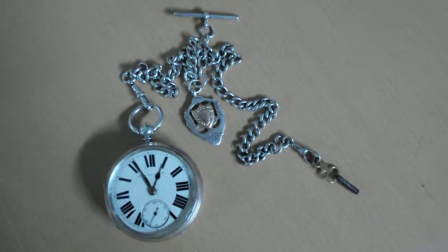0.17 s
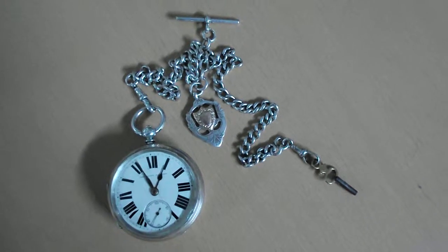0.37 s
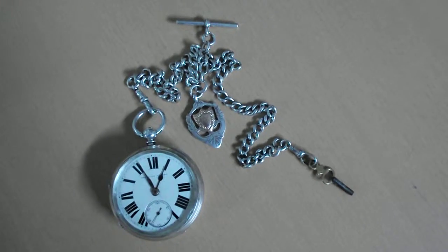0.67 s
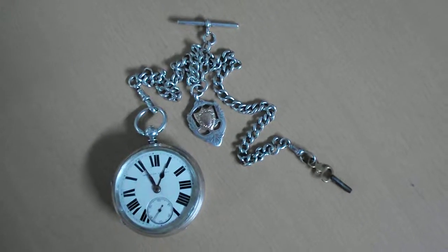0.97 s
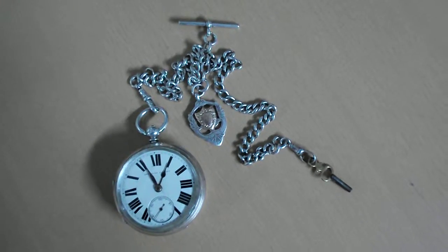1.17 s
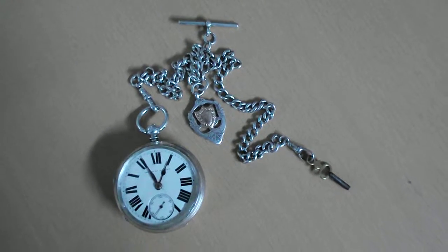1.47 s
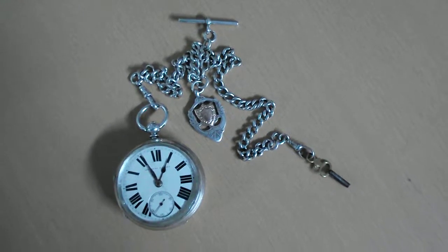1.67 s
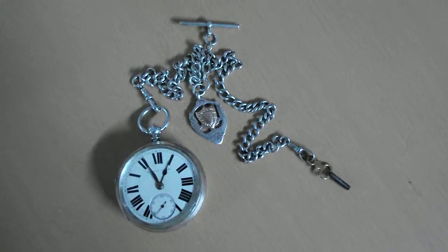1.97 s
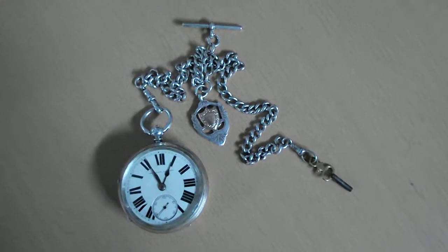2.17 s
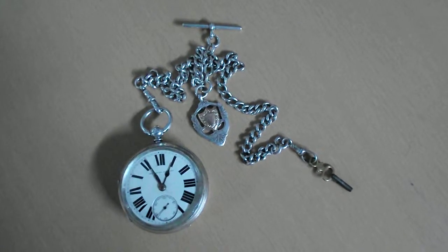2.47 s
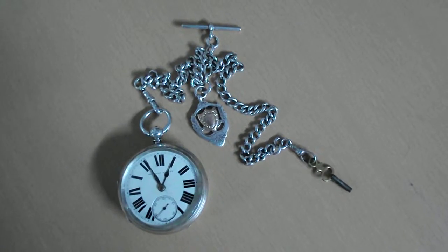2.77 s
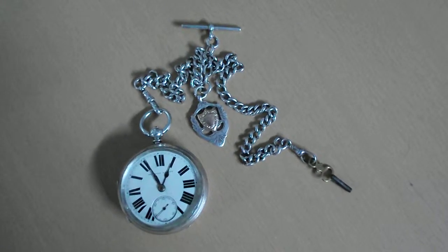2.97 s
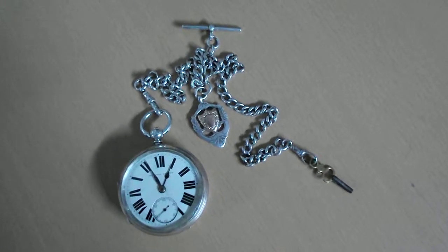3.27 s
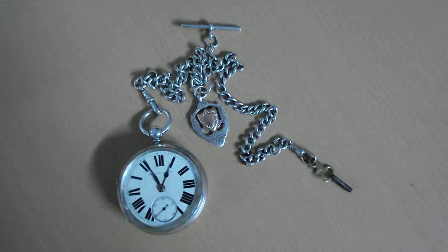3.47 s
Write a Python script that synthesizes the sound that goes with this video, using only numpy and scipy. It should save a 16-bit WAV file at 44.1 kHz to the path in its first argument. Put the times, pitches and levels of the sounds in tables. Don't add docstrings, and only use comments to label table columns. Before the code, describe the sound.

A pocket watch ticks crisply and steadily over low room rumble and constant hiss.

```python
import sys
import numpy as np
from scipy import signal
from scipy.fft import rfft, irfft, next_fast_len
from scipy.io import wavfile

SR = 44100
rng = np.random.default_rng(int(sys.argv[2]) if len(sys.argv) > 2 else 0)


def dump(signal):
    limited = np.clip(np.atleast_2d(signal).T, -1, 1)
    pcm = np.round(limited * 32767).astype(np.int16)
    wavfile.write(sys.argv[1], SR, pcm)


def how_loud(loudness_db):
    steps = np.asarray(loudness_db, float) / 20
    return 10 ** steps


N = 159642
TIME = np.arange(N) / SR


def level(x, db):
    return x * how_loud(db) / np.sqrt(np.mean(x ** 2))


def shaped(gain):
    size = next_fast_len(N)
    hz = np.arange(size // 2 + 1) * SR / size + .01
    return irfft(rfft(rng.standard_normal(size)) * gain(hz), size)[:N]


def resonance(hz, width_hz):
    return level(shaped(lambda f: 1 / (1 + (2 * (f - hz) / width_hz) ** 2)), 0)


def walk(rate_hz):
    return level(shaped(lambda f: 1 / (1 + (f / rate_hz) ** 4)), 0)


def window(start, length, edge):
    return np.clip(np.minimum(TIME - start, start + length - TIME) / edge, 0, 1)


# (frequency [Hz], width [Hz], rms level [dB])
ROOM_MODES = [(20.5, 6.5, -34.5), (35.4, 17.6, -32.5), (63, 25, -43), (102.74, 13.4, -37.5),
              (119.8, 8.8, -41), (141.3, 7.9, -49.5), (157, 11.5, -43.5), (183.8, 24, -40),
              (225.5, 33, -43.5), (264.4, 24, -48.5), (290.7, 6.4, -54), (300.5, 16, -46.5),
              (410.7, 12.5, -61.5), (453.3, 11, -64.5)]
GROUP_EDGES = [50, 135, 240, 330]
# (time [s], lowest modes [dB], 100 Hz modes [dB], 200 Hz modes [dB], 300 Hz modes [dB])
TRAFFIC_SWELL = [(0, 2.5, -2, -0.5, -1), (.2, 1, 3, 2.5, 1.5), (.6, -2.5, 0, 0, -1),
                 (.78, -1, -1.5, 1.5, 0), (.92, 3, 0.5, 1.5, 3.5), (1.0, 0, -8, -1.5, -3.5),
                 (1.13, 0.5, 3.5, 1.5, 2.5), (1.45, -3, -1.5, 2.5, 0), (1.7, -3, 2.5, -1.5, -3.5),
                 (1.82, 0, 0, -2.5, 0.5), (2.1, 1.5, 0, 0, 3), (2.4, -1, -8, -3, 3),
                 (2.75, -1.5, -1, 3, -4), (2.95, 1, -1.5, 0, -4), (3.17, -4.5, 0, 2.5, 0),
                 (3.35, 6, -4.5, -0.5, -3), (3.6, -2.5, 1.5, 1, 1)]


def room_modes():
    swell_db, swell_rate_hz = 0.5, 1.46
    traffic = np.array(TRAFFIC_SWELL).T
    out = np.zeros(N)
    for hz, width_hz, db in ROOM_MODES:
        group = 1 + np.searchsorted(GROUP_EDGES, hz)
        if group < len(traffic):
            swell = np.interp(TIME, traffic[0], traffic[group])
        else:
            swell = swell_db * walk(swell_rate_hz)
        out += how_loud(db + swell) * resonance(hz, width_hz)
    return out


# (frequency [Hz], width [Hz], rms level [dB])
DUCT_MODES = [(598, 22, -61.5), (729, 67, -61.5), (1002, 47, -65)]


def duct():
    return sum(how_loud(db) * resonance(hz, width_hz) for hz, width_hz, db in DUCT_MODES)


# (frequency [Hz], width [Hz], rms level [dB])
AIR_BANDS = [(820, 680, -61), (1500, 810, -66), (2700, 1700, -63.5)]


def outdoor_air():
    patch_db, patch_rate_hz = 3, 3
    out = np.zeros(N)
    for hz, width_hz, db in AIR_BANDS:
        out += how_loud(db + patch_db * walk(patch_rate_hz)) * resonance(hz, width_hz)
    return out


# (frequency [Hz], density [dB per Hz])
HISS_SPECTRUM = [(200, -4.5), (340, -3.5), (520, -10.5), (1120, -16.5), (3000, -20), (7000, -25),
                 (11500, -28), (15700, -31)]


def hiss():
    hiss_db, flicker_db = -44.5, 0.45
    hz, db = np.array(HISS_SPECTRUM).T

    def gain(f):
        return how_loud(np.interp(np.log(f), np.log(hz), db)) * np.minimum(f / 150, 1)

    return level(shaped(gain), hiss_db) * how_loud(flicker_db * walk(6))


# (frequency [Hz], gain [dB])
WHINE_RESPONSE = [(10100, -2), (10450, -4), (10600, 0), (10780, 0), (10930, 2.5), (11050, 1), (11200, -7),
                  (11500, -20)]


def whine():
    carrier_hz, flip_hz, flip_phase = 10649.15, 40.335, -.65
    whine_db, leak_db, wobble_db = -60.6, -19, .7
    hz, db = np.array(WHINE_RESPONSE).T
    out = how_loud(leak_db) * np.sqrt(2) * np.cos(2 * np.pi * carrier_hz * TIME)
    for k in range(-17, 18, 2):
        f = carrier_hz + k * flip_hz
        strength = how_loud(np.interp(f, hz, db)) * 2 * np.sqrt(2) / (np.pi * k)
        out = out + strength * np.sin(2 * np.pi * f * TIME + k * flip_phase)
    return how_loud(whine_db + wobble_db * walk(3.3)) * out


# (start [s], length [s], centre frequency [Hz], level [dB])
HAND_RUSTLES = [
    (2.41, 0.128, 3900, -58),
    (2.936, 0.042, 1500, -60),
    (3.19, 0.066, 3600, -60),
]


def rustles():
    out = np.zeros(N)
    for start, length, hz, db in HAND_RUSTLES:
        out += how_loud(db + 3 * walk(60)) * window(start, length, .02) * resonance(hz, hz / 2)
    return out


# (start [s], length [s], frequency [Hz], level [dB])
PIVOT_SQUEAKS = [
    (.199, .088, 6505, -61),
    (2.211, .082, 6505, -60.5),
]


def squeaks():
    width_hz, edge_s, roughness = 200, .008, .35
    out = np.zeros(N)
    for start, length, hz, db in PIVOT_SQUEAKS:
        tone = np.sqrt(2) * np.sin(2 * np.pi * hz * TIME)
        rough = roughness * resonance(hz, width_hz)
        out += how_loud(db) * window(start, length, edge_s) * (rough + tone)
    return out


def ring(pitches, rings, side, t, luck):
    scatter_db, detune = 1.2, .004
    hz = np.array(pitches)[:, [side]]
    db = np.array(rings)[:, [side]]
    t60 = np.array(rings)[:, [2]]
    luck = luck[:len(hz)]
    tone = np.sin(2 * np.pi * hz * (1 + detune * luck[:, [0]]) * t)
    decay = np.exp(-np.log(1000) * t / t60)
    return np.sum(how_loud(db + scatter_db * luck[:, [1]]) * decay * tone, axis=0)


# (tick [Hz], tock [Hz])
PLATE_PITCHES = [(5146, 5114), (5540, 5512), (5781, 5738), (5960, 5930), (6160, 6140), (9140, 9140),
                 (10300, 10350), (4328, 4306)]
TOP_PITCHES = [(6567, 6449), (6380, 6640)]
CASE_PITCHES = [(3682, 3574), (3330, 3294), (3060, 3080), (3540, 3720), (3880, 3900)]
# (tick [dB], tock [dB], t60 [s])
PLATE_DECAYS = [(-4.5, -10, 0.035), (-18, -9, 0.011), (2.5, 0.5, 0.022), (2, 7, 0.0091), (3, -11, .015),
                (-10, -17, .02), (-17, -8, 0.019), (-8, -9, 0.046)]
TOP_DECAYS = [(-4.5, -1, 0.02), (-8, -32, .015)]
CASE_DECAYS = [(0, -1.5, 0.02), (-12, -3.5, 0.011), (-16, -21, .02), (-8, -9, 0.023), (-16, -14, 0.016)]
# (lead [s], plate [dB], top plate [dB], case [dB])
TICK_BLOWS = [
    (-.0415, -13, -21, -18),
    (-.0205, -13, 1, -8),
    (-.017, -16, -18, -10),
    (.0008, 1.5, 4, 1),
    (.0037, -6, -12, -19),
    (.007, -30, -18, 5.5),
]
TOCK_BLOWS = [
    (-.0415, -21, -14, -16),
    (-.021, -14, -5, -6),
    (-.017, -35, -12, -12),
    (.0008, 0.5, 3, 3),
    (.0033, -10, -19, -11),
    (.0115, -14, -22, -12),
]
# (drop [s], peak [dB], case ring [dB], top plate ring [dB], strongest plate mode [dB])
WATCH_BEATS = [(0.1885, -34, -18, -19, -14), (0.4239, -33, -11.5, -13.5, -15),
               (0.6539, -34.5, -13.5, -16, -10), (0.8889, -32, -9.5, -18, -7.5),
               (1.1184, -36.5, -10.5, -11, -13), (1.3548, -33.5, -12, -13, -8),
               (1.5828, -36, -15, -13, -11), (1.8198, -35, -8, -9, -9), (2.0477, -37, -15, -10, -10),
               (2.2852, -33.5, -14, -17, -10), (2.5132, -39, -13, -10, -15), (2.7496, -36, -14, -11.5, -14),
               (2.9781, -37, -11, -11, -11), (3.2151, -34, -11.5, -12.5, -15),
               (3.4436, -36, -13.5, -18, -12)]


def watch():
    watch_db, top_gain_db, case_gain_db, main_mode_db = -5.5, 13, 15, 12
    contact_s, case_rise_s = .0004, .0014
    crack_db, crack_s = -17, .001
    out = np.zeros(N + SR)
    t = np.arange(SR // 16) / SR
    luck = rng.standard_normal((len(WATCH_BEATS), len(TICK_BLOWS), 3, 8, 2))
    band = signal.butter(2, (4500, 11000), "bandpass", fs=SR, output="sos")
    grit = signal.sosfilt(band, rng.standard_normal(N + SR))
    contact = 1 - np.exp(-t / contact_s)
    case_rise = 1 - np.exp(-t / case_rise_s)
    crack_decay = how_loud(crack_db) * np.exp(-t / crack_s)
    for i, (drop_s, db, case_db, top_db, main_db) in enumerate(WATCH_BEATS):
        side = i % 2
        plate_decays = np.array(PLATE_DECAYS, float)
        plate_decays[2, side] += main_mode_db + main_db
        blows = list((TICK_BLOWS, TOCK_BLOWS)[side])
        if i == 0:
            blows[4] = (.0056, 0, 0, blows[4][3])
        for (lead, plate, top, case), (plate_luck, top_luck, case_luck) in zip(blows, luck[i]):
            k = int((drop_s + lead) * SR)
            crack = crack_decay * grit[k:k + len(t)]
            plate_ring = ring(PLATE_PITCHES, plate_decays, side, t, plate_luck)
            top_ring = ring(TOP_PITCHES, TOP_DECAYS, side, t, top_luck)
            case_ring = case_rise * ring(CASE_PITCHES, CASE_DECAYS, side, t, case_luck)
            blow = how_loud(plate) * (plate_ring + crack)
            blow = blow + how_loud(top_gain_db + top_db + top) * top_ring
            blow = blow + how_loud(case_gain_db + case_db + case) * case_ring
            out[k:k + len(t)] += how_loud(watch_db + db) * contact * blow
    return out[:N]


def scene():
    background = room_modes() + duct() + outdoor_air()
    electronics = hiss() + whine()
    return (background + electronics + rustles() + squeaks() + watch())[None]


def roll_off(x):
    return signal.sosfilt(signal.butter(12, 16400, fs=SR, output="sos"), x)


def record(dry):
    cutoff_hz = 15750
    size = next_fast_len(N)
    passed = np.arange(size // 2 + 1) * SR / size < cutoff_hz
    mix = irfft(rfft(dry, size) * passed, size)[:, :N]
    return roll_off(mix)


dry = scene()
out = record(dry)
dump(out)
```